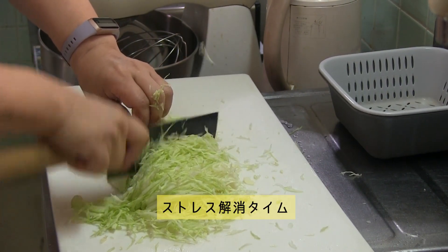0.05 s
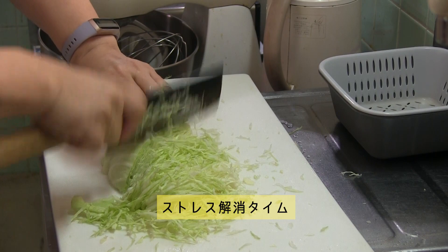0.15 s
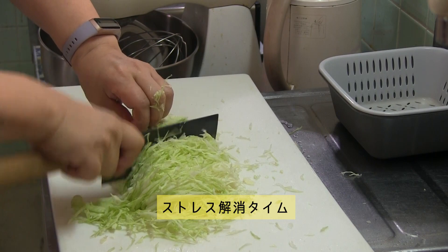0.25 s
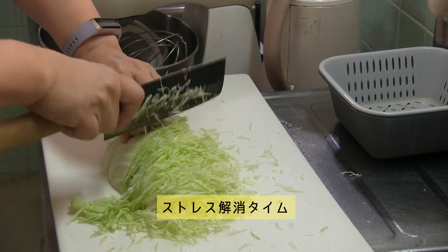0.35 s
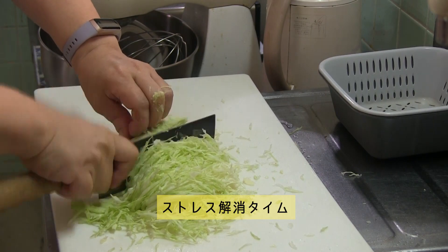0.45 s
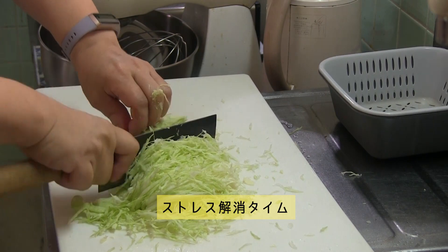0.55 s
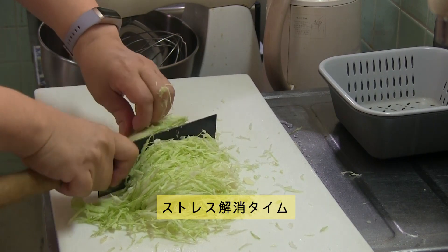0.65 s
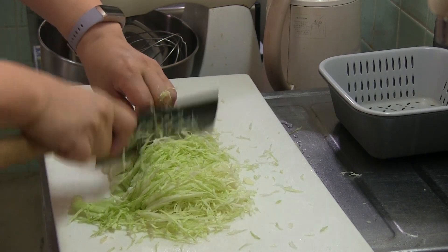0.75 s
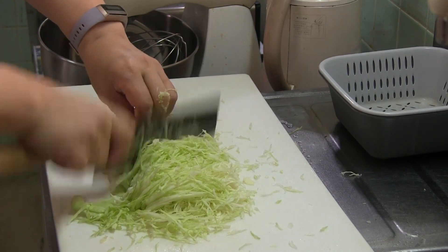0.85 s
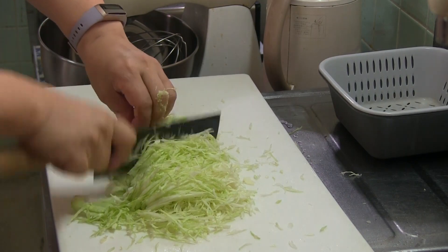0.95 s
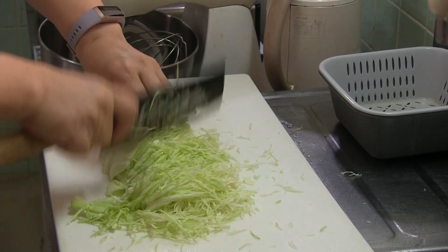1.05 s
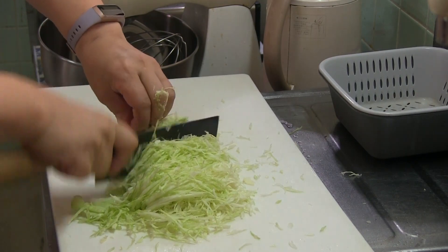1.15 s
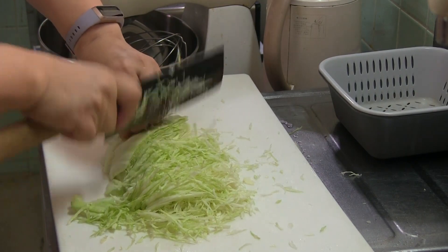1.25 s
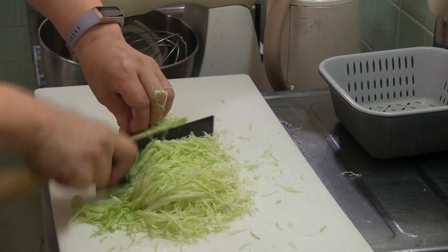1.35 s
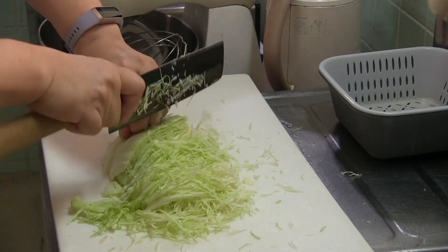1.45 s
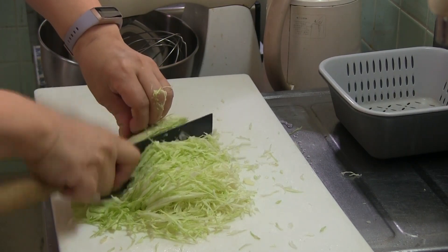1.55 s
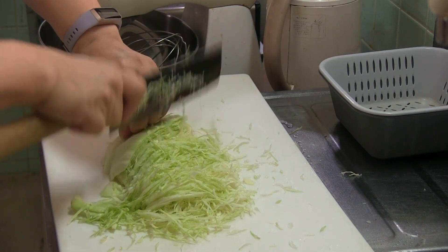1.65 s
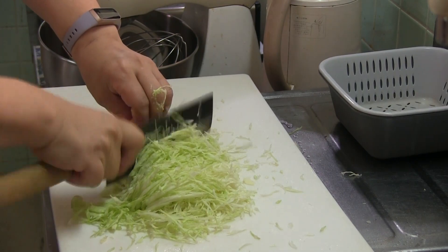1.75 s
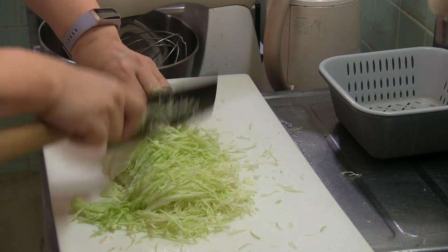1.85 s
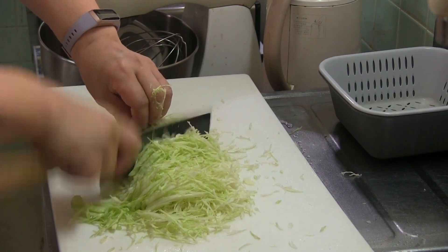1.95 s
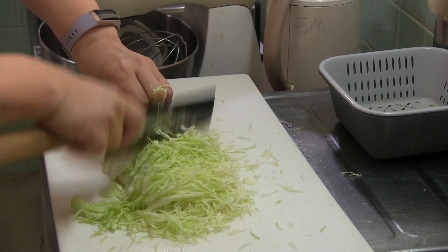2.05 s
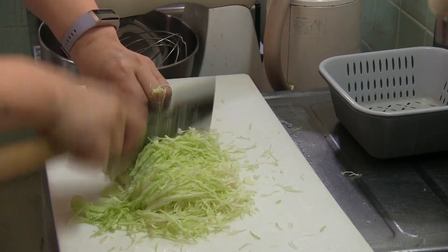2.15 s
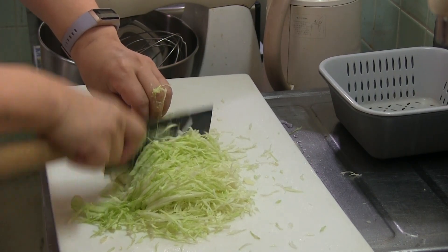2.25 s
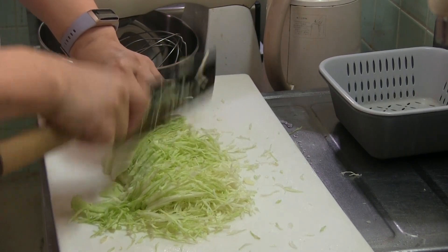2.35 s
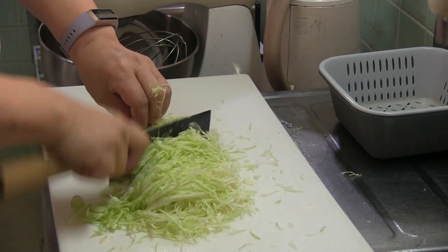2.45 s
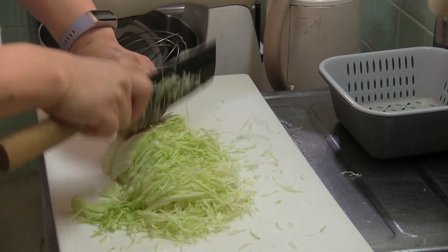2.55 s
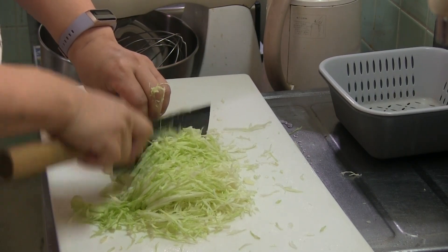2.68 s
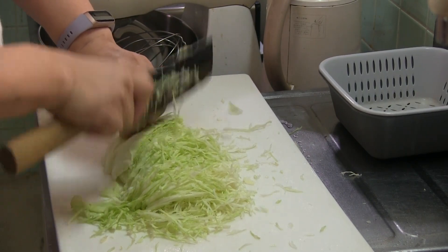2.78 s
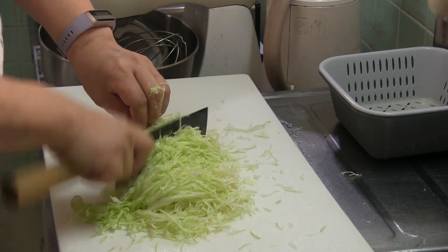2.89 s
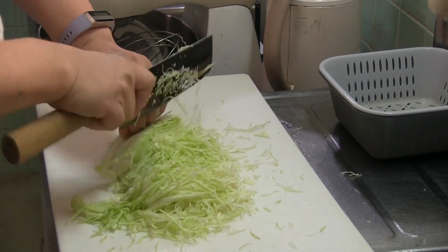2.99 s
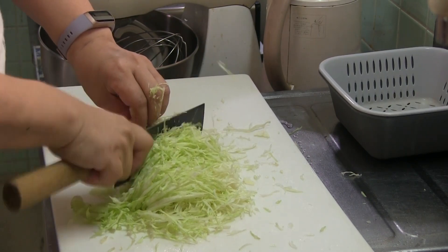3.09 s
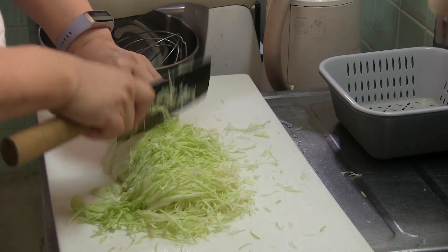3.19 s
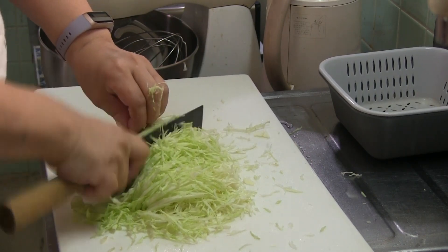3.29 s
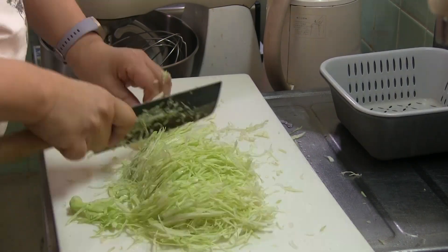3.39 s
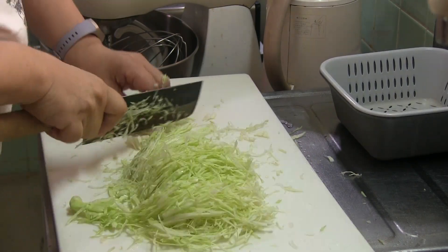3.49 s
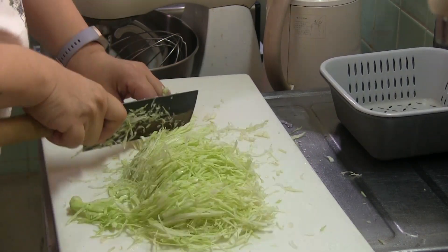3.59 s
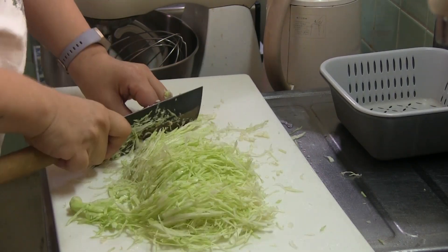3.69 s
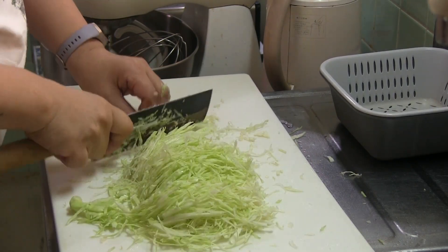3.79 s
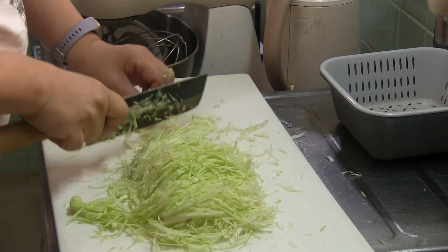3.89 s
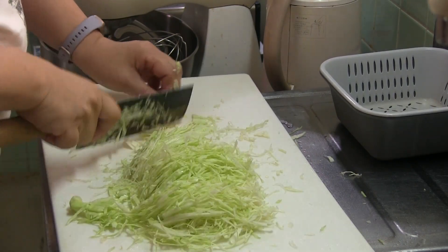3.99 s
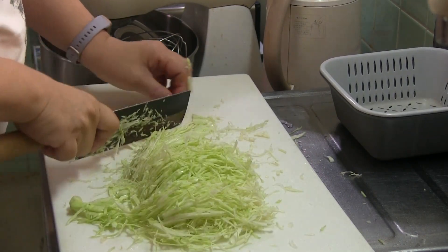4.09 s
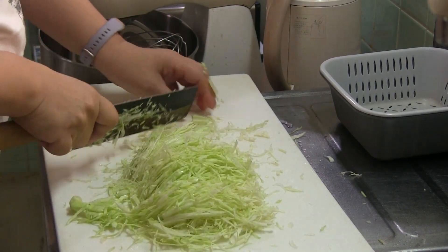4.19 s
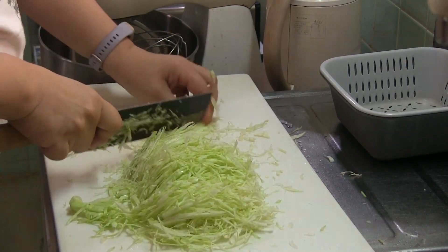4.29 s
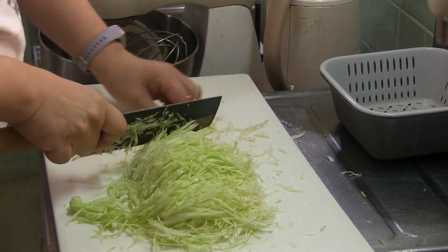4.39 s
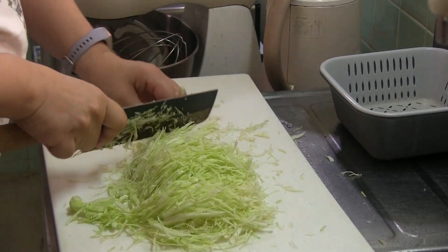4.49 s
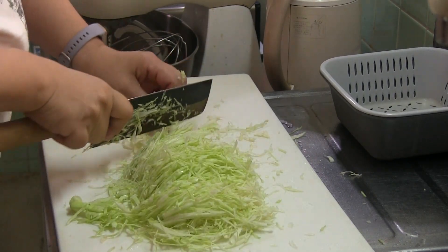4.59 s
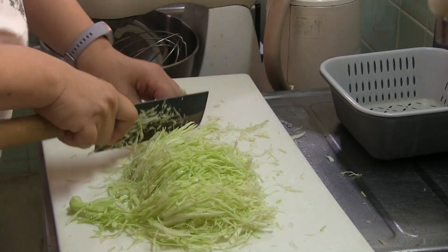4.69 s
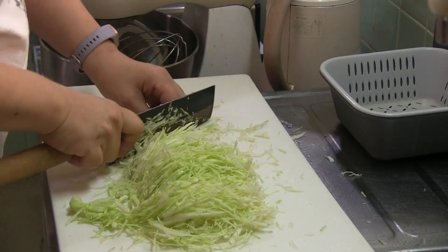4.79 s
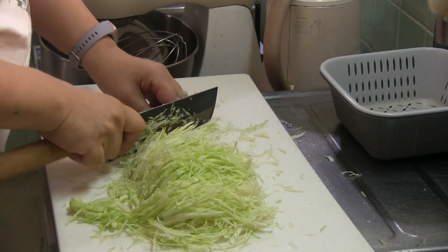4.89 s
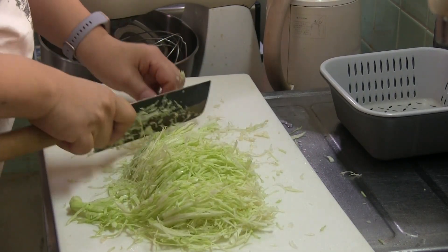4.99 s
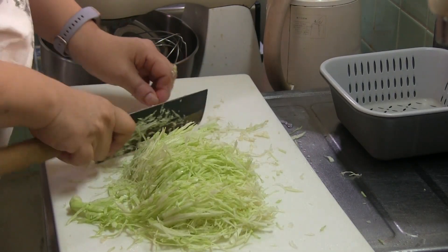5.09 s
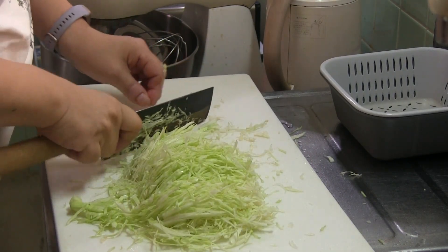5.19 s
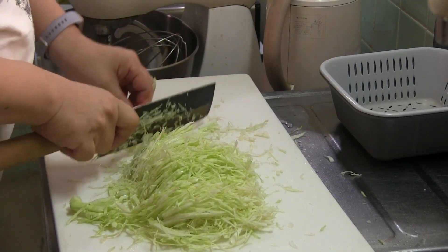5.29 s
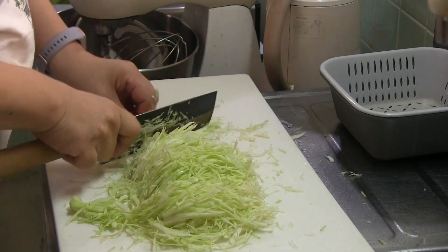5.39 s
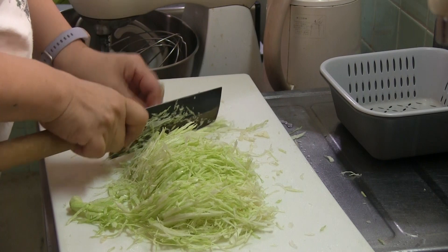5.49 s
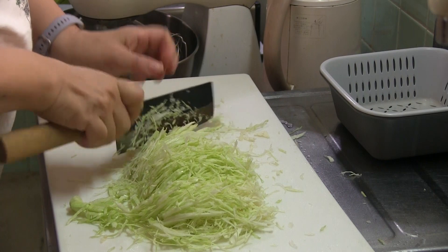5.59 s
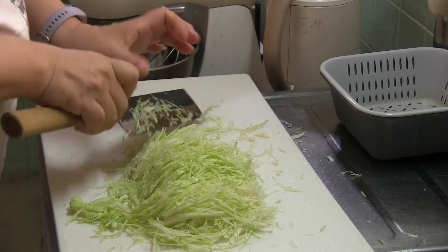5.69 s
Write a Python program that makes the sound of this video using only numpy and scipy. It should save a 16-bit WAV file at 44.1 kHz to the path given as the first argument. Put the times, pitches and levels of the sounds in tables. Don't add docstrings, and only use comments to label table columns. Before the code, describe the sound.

A cleaver rapidly shreds cabbage on a plastic board, loud crisp knocks, then slower blows with light scrapes over a low ventilation rush.

```python
import sys
import numpy as np
from scipy import signal
from scipy.fft import rfft, irfft, next_fast_len
from scipy.io import wavfile
from scipy.ndimage import uniform_filter1d, map_coordinates

SR = 44100
rng = np.random.default_rng(int(sys.argv[2]) if len(sys.argv) > 2 else 0)


def wrap_up_sound(samples):
    columns = np.atleast_2d(samples).T
    tamed = np.clip(columns, -1, 1)
    steps = np.round(tamed * 32767).astype(np.int16)
    wavfile.write(sys.argv[1], SR, steps)


def field_ratio(decibels):
    return 10 ** (np.asarray(decibels, dtype=float) / 20)


N = 253124
CUT = 3.456
LONG = SR * 2 // 5

# [t/s, level/dB, time in leaves/s, crunch level/dB, crispness/dB]
FAST_STROKES = [(0.095, -3, 0.039, -33, -1), (0.326, -4, .05, -31, -2.5), (0.549, -2, .04, -30.5, -2),
                (0.984, -1.5, 0.017, -37.5, -6.5), (1.208, -2.5, 0.03, -34, -3),
                (1.419, -2, 0.027, -32.5, -14), (1.638, -2, 0.033, -31, -8),
                (1.894, -3.5, 0.065, -28.5, -3), (2.072, -1.5, 0.02, -31, -7.5),
                (2.287, -1.5, 0.027, -33, -10), (2.515, -2.5, 0.037, -32, -4),
                (2.749, -6, 0.053, -31.5, -2), (2.954, -2.5, 0.031, -30, -6.5),
                (3.389, -2, 0.031, -36, 0.5)]
# [t/s, level/dB, contact/ms, crack level/dB]
EARLIER_STROKE = [
    (-.13, -1.7, 0.18, -20),
]
# [delay/ms, left level/dB, right level/dB]
WALLS_FIRST = [(3.15, -6, -5), (3.6, -10, -7), (5.0, -7, -6), (6.3, -5, -5), (8.95, -9, -5), (15.8, -9, -8)]
# [f/Hz, level/dB, t60/s]
RING_FIRST = [(60.2, -12, 0.52), (103, -22, 0.29), (149.8, -17, 0.39), (178.8, -3.5, 0.25),
              (205.2, -6, 0.3), (240.8, -7, 0.35), (288, 0.5, 0.12), (310, 2.5, 0.17), (338.6, -11, 0.39),
              (426, -8.5, 0.32), (463, 0, 0.15), (512.6, -7, 0.34), (525.6, -9.5, 0.28), (572.3, 0.5, 0.26),
              (584.4, 0, 0.27), (652.4, -1.5, 0.29), (704, -8.5, 0.27), (745, -9, 0.32), (850, -9, 0.19),
              (910, -11.5, 0.23), (955, 1, 0.12), (994, -8, 0.27), (1049, -16, 0.38), (1155, -31, 0.19),
              (1237, -13, 0.28), (1330, -17, 0.29), (1344, -15, 0.22), (1437, -2.5, 0.26),
              (1474, -12, 0.36), (1600, -12, 0.11)]


def fast_strokes():
    contact_ms = 0.19
    blows = [(s, db, contact_ms, -23.5 + 63 * cut_s) for s, db, cut_s, _, _ in FAST_STROKES]
    events = EARLIER_STROKE + blows
    return small(knocks(events, WALLS_FIRST, RING_FIRST, ring_db=-17, wet_db=13, lean_db=-0.24))


# [t/s, level/dB, contact/ms, crack level/dB]
SLOW_BLOWS = [
    (4.1255, -6, .23, -26.5),
    (4.8135, -10, 0.28, -35),
    (5.1655, -7, 0.2, -26.5),
]
# [delay/ms, left level/dB, right level/dB]
WALLS_SECOND = [(1.8, -3.5, -1), (3.3, -10, -17), (5.0, -9, -24), (10.9, -4, -9), (15.7, -14, -9)]
# [f/Hz, level/dB, t60/s]
RING_SECOND = [(143.5, -8.5, 0.23), (176.4, -10.5, 0.34), (203.5, -4, 0.18), (238.5, 0.5, 0.23),
               (289.7, 0, 0.19), (330, -2, 0.18), (373, -8.5, 0.35), (462, -3, 0.26), (544, -1, 0.16),
               (570, -6, 0.3), (545, -7.5, 0.38), (680, -7, 0.094), (696, -6.5, 0.19), (795, -2.5, 0.15),
               (850, -7, 0.28), (953, -9, .22), (1000, -16, 0.18), (1083, -15, 0.33), (1130, -10, 0.22),
               (1370, -18, .2), (1400, -12, 0.19), (1486, -8, 0.21), (1586, -0.5, 0.11), (1653, -14, 0.16)]


def slow_blows():
    return small(knocks(SLOW_BLOWS, WALLS_SECOND, RING_SECOND, ring_db=-15, wet_db=11, lean_db=-0.1))


# [t/s, level/dB, contact/ms, crack level/dB]
SOFT_BUMPS = [
    (3.808, -27.5, 0.24, -40),
    (3.821, -23, 0.66, -40),
    (3.879, -35, 0.6, -34.5),
    (4.859, -26, 0.32, -40),
    (4.915, -27, 0.5, -40),
    (5.436, -45, 0.11, -22),
]
# [f/Hz, level/dB, t60/s]
COUNTER_RING = [(52, -17, 0.66), (136, -3, 0.2), (190.5, -0.5, 0.44), (207.4, 4, 0.33), (250, -5, 0.29),
                (291.4, -5, 0.25), (353.6, 0, 0.23), (461, -8, 0.24), (595, -8, 0.4)]


def soft_bumps():
    return knocks(SOFT_BUMPS, WALLS_SECOND, COUNTER_RING, ring_db=-7.5, wet_db=3, lean_db=1.0)


def knocks(events, walls, modes, ring_db, wet_db, lean_db):
    t = np.arange(LONG) / SR
    waves = ringing(modes, ring_db, lean_db)
    haze = field_ratio(wet_db) * tail(KNOCK_COLOUR, 0.0014)
    echoes = np.zeros((2, LONG))
    echoes[:, 0] = field_ratio([0.4, -0.4])
    for ms, left_db, right_db in walls:
        echoes[:, round(ms * SR / 1000)] += field_ratio([left_db, right_db])
    lead = SR // 4
    out = np.zeros((2, lead + N + SR))
    u = np.arange(-90, 91) / SR * 1000
    for s, db, contact_ms, crack_db in events:
        force = np.exp(-(u / contact_ms) ** 2 / 2)
        push = -1.6 * u / contact_ms * force - 0.31 * force
        crack = np.pad(edge_crack(crack_db), (72, 0))
        direct = signal.fftconvolve(echoes, push[None], axes=1)[:, :LONG]
        direct += signal.fftconvolve(echoes, crack[None], axes=1)[:, :LONG]
        spot = field_ratio(2.5 * rng.standard_normal(waves.shape[1]))
        ring = spot @ waves + haze + field_ratio(wet_db - 3) * tail(KNOCK_COLOUR, 0.00037)
        soft = np.exp(-(u / max(contact_ms - 0.13, 0.02)) ** 2 / 2)
        body = signal.fftconvolve(ring, soft[None] / soft.sum(), axes=1)[:, :LONG]
        body = np.pad(body, ((0, 0), (30, 0)))[:, :LONG]
        start = lead + round(s * SR) - 30
        out[:, start:start + LONG] += field_ratio(db + 2.5) * (direct + body)
    return out[:, lead:lead + N]


def ringing(modes, ring_db, lean_db):
    t = np.arange(LONG) / SR
    hz, level_db, t60 = np.repeat(np.transpose(modes), 3, axis=1)[..., None]
    flank = np.arange(len(hz))[:, None] % 3 > 0
    hz = hz + 15 * rng.standard_normal(hz.shape) * flank
    phase = 2 * np.pi * rng.random(hz.shape)
    phase = phase + 0.38 * np.minimum(hz / 450, 1) * rng.standard_normal((2, *hz.shape))
    pan = field_ratio(1.5 * rng.standard_normal((2, *hz.shape)) + [[[lean_db]], [[-lean_db]]])
    level_db = level_db + ring_db - 2 - 5 * flank - 1.5 * np.log2(1 + hz / 600)
    build = 1 - np.exp(-t / 0.003)
    return pan * np.sin(2 * np.pi * hz * t + phase) * field_ratio(level_db - 60 * t / t60) * build


def edge_crack(crack_db):
    t = np.arange(LONG) / SR
    peak = lambda f, centre, width: 1 / (1 + ((f - centre) / width) ** 2)
    colour = lambda f: 0.053 + peak(f, 2900, 900) + 0.21 * peak(f, 6500, 1500)
    return field_ratio(crack_db + 6.5 - 60 * t / 0.013) * filtered(rng.standard_normal(LONG), colour)


def small(x):
    return signal.sosfilt(signal.butter(3, 120, "high", fs=SR, output="sos"), x)


# [t/s, length/s, level/dB, crispness/dB]
SHORT_CUTS = [
    (0.498, 0.023, -40, -9),
    (0.838, .014, -58, -5),
    (3.144, 0.064, -30, -1.5),
]
# [t/s, level/dB]
BLADE_LIFTS = [(0, -50.5), (.735, -53), (.87, -51.5), (1.059, -43), (1.1, -56), (1.215, -50), (1.31, -49.5),
               (1.525, -49), (1.75, -45.5), (2.167, -48), (2.399, -50.5), (2.613, -49), (2.836, -51),
               (3.051, -47.5), (3.412, -39.5)]


def crunches():
    def crunch(s, length, db, crisp_db):
        swell_db = 9 - 190 * length
        body_db = 2.5 + 0.87 * crisp_db
        return s, length + 0.0021, db, swell_db, crisp_db, body_db

    cuts = [crunch(s - cut_s, cut_s, db, crisp_db) for s, _, cut_s, db, crisp_db in FAST_STROKES]
    cuts += [crunch(*row) for row in SHORT_CUTS]
    lifts = [(s, 0.028, db, -7, -5, 0) for s, db in BLADE_LIFTS]
    return leaves(cuts + lifts)


# [t/s, length/s, level/dB, swell/dB, brightness/dB]
SHRED_SCRAPES = [(3.651, 0.017, -48.5, -8, 3.5), (3.717, .05, -54, 4.5, 9.5),
                 (3.751, 0.05, -46, -2.5, 12.5), (3.774, 0.012, -41, -1, 7), (3.881, .025, -60, -4, 2),
                 (4.122, 0.014, -47, -16, 5), (4.143, .042, -62, -9, 10), (4.805, 0.031, -51, 4, 8),
                 (4.836, 0.069, -44.5, .5, 3.5), (5.181, 0.057, -55.5, -12, 10.5),
                 (5.432, 0.01, -44.5, 5, 4), (5.455, 0.021, -62, 0, 15)]


def scrapes():
    body_db = 0.5
    return leaves([(*row, body_db) for row in SHRED_SCRAPES])


# [t/s, length/s, f/Hz, level/dB]
BLADE_SQUEAKS = [
    (.865, .035, 4500, -55),
    (1.085, .045, 4550, -50),
    (.832, .012, 4800, -60),
    (3.655, .06, 4950, -62),
    (.875, .03, 7400, -64),
]


def leaves(rows):
    t = np.arange(N) / SR
    power = np.zeros((3, N))
    for s, length, db, swell_db, top_db, body_db in rows:
        span = slice(max(round((s - 0.01) * SR), 0), round((s + length + 0.08) * SR))
        age = t[span] - s
        swell = swell_db * (2 * np.clip(age / max(length, 0.004), 0, 1) - 1)
        rise = np.clip((age + 0.0019) / 0.008, 0, 1) ** 1.4
        shape = rise * field_ratio(swell - 60 * np.maximum(age - length, 0) / 0.028)
        power[:, span] += (shape * field_ratio(db + np.array([[body_db], [0], [top_db]]))) ** 2
    below = lambda f, edge_hz: 1 / (1 + (f / edge_hz) ** 4)
    fine = snaps(grain=20, rough_db=2.8)
    body = filtered(snaps(grain=60, rough_db=4.5), lambda f: below(f, 3000))
    hiss = filtered(fine, lambda f: 1 - below(f, 3000))
    top = filtered(fine, lambda f: 1 - below(f, 7100))
    dry = np.sum(np.sqrt(power) * [body, hiss - top, top], axis=0) / np.std(hiss) * field_ratio(1.5)
    slip = 0.03 * np.cumsum(rng.standard_normal(N))
    for s, length, hz, db in BLADE_SQUEAKS:
        arch = np.sin(np.pi * np.clip((t - s) / length, 0, 1))
        dry += field_ratio(db + 3) * arch * np.sin(2 * np.pi * hz * t + slip)
    wet = signal.fftconvolve(dry[None], tail([(100, 1.0), (16000, -3.1)], 0.00028), axes=1)[:, :N]
    return field_ratio(-2.5) * dry + field_ratio(-5.5) * wet


# [f/Hz, level/dB per Hz]
CRUNCH_COLOUR = [(59, -19), (100, -14), (197, -4.5), (492, -17), (570, -8.5), (705, -14), (1010, -7),
                 (1650, -9), (2470, -8.5), (11400, -18.5), (16000, -25.5)]


def snaps(grain, rough_db):
    lumps = unit(uniform_filter1d(rng.exponential(1, N) - 1, size=grain))
    crackle = unit(rng.standard_normal(N) * field_ratio(rough_db * np.minimum(lumps, 2.5)))
    return filtered(crackle, lambda f: field_ratio(along(CRUNCH_COLOUR, f)))


# [f/Hz, level/dB per Hz]
KNOCK_COLOUR = [(150, -15.5), (300, -6), (600, 2), (1200, -4.5), (1750, -6.5), (2200, -13.5), (2700, -10.5),
                (3200, -16), (5000, -16), (9000, -30), (14000, -58)]
# [f/Hz, t60/s]
ROOM_T60 = [(100, 0.69), (260, 0.3), (700, 0.35), (1800, 0.32), (5000, 0.32), (12000, 0.27)]


def tail(spectrum, onset):
    hz, t, z = signal.stft(diffuse(LONG, spectrum, wide=0.99), SR, nperseg=256)
    decay = field_ratio(-60 * t / along(ROOM_T60, hz)[:, None])
    dying = signal.istft(z * decay, SR, nperseg=256)[1][:, :LONG]
    dying = dying * (1 - np.exp(-np.arange(LONG) / SR / onset))
    return dying / np.linalg.norm(dying[0])


# [f/Hz, likeness 0..1]
LIKENESS = [(60, 0.91), (300, 0.93), (1400, 0.49), (6800, 0.43), (15000, 0.53)]


def diffuse(size, spectrum, wide=1):
    def mid_side(hz):
        turn = np.arccos(np.clip(along(LIKENESS, hz), -1, 1)) / 2 * wide
        return field_ratio(along(spectrum, hz)) * [np.cos(turn), np.sin(turn)]

    mid, side = filtered(rng.standard_normal((2, size)), mid_side)
    return unit(np.array([mid + side, mid - side]))


# [f/Hz, level/dB per Hz]
RUSH_FIRST = [(12, -32), (20, -1), (198, 10), (1290, -5.5), (2530, -12), (3440, -15), (4540, -13.5),
              (5380, -18.5), (7310, -16), (13500, -28.5), (16000, -37)]
# [f/Hz, level/dB per Hz]
RUSH_SECOND = [(12, -59), (20, -36), (49, -4), (82, -12), (158, -9), (182, -5.5), (285, -6), (319, -7),
               (500, -9.5), (873, -13.5), (2500, -22.5), (3300, -28), (16000, -39.5)]
# [t/s, level/dB]
RUSH_LEVEL = [(0, -45), (.9, -47.5), (3.455, -49), (3.457, -43.5), (5.135, -42.5), (5.145, -49.5),
              (5.74, -48)]
# [f/Hz, level/dB]
FRIDGE_HUM = [(58.8, -52.5), (118.4, -57), (188.4, -55.5)]


def background():
    t = np.arange(N) / SR
    rush = np.where(t < CUT, diffuse(N, RUSH_FIRST), diffuse(N, RUSH_SECOND))
    drift = rng.standard_normal((len(FRIDGE_HUM), 60))
    where = np.broadcast_arrays(np.arange(len(FRIDGE_HUM))[:, None], 8 * t)
    waver = map_coordinates(drift, where, order=1)
    hum = np.zeros(N)
    for (hz, db), w in zip(FRIDGE_HUM, waver):
        hum += field_ratio(db + 1.5 * w) * np.sin(2 * np.pi * hz * t + 0.4 * w)
    return field_ratio(np.interp(t, *np.transpose(RUSH_LEVEL))) * rush + hum * np.where(t < CUT, field_ratio(-5), 1)


def unit(x):
    return x / np.sqrt(np.mean(x ** 2) + 1e-20)


def along(points, hz):
    f, v = np.transpose(points)
    return np.interp(np.log(hz + 1), np.log(f + 1), v)


def filtered(x, response):
    m = next_fast_len(x.shape[-1] + 8192)
    return irfft(rfft(x, m) * response(np.fft.rfftfreq(m, 1 / SR)), m)[..., :x.shape[-1]]


def scene():
    first = fast_strokes() + crunches()
    second = slow_blows() + scrapes() + soft_bumps()
    fade = np.clip((np.arange(N) / SR - CUT) / 0.00083 + 1, 0, 1)
    return first * (1 - fade) + second * fade + background()


def roll_off(x):
    return signal.sosfilt(signal.butter(12, 16480, fs=SR, output="sos"), x)


def record(dry):
    rounded = dry / (1 + np.abs(dry / 0.97) ** 8) ** (1 / 8)
    mix = filtered(rounded, lambda f: 1 / (1 + (f / 15900) ** 60))
    return roll_off(mix)


dry = scene()
out = record(dry)
wrap_up_sound(out)
```